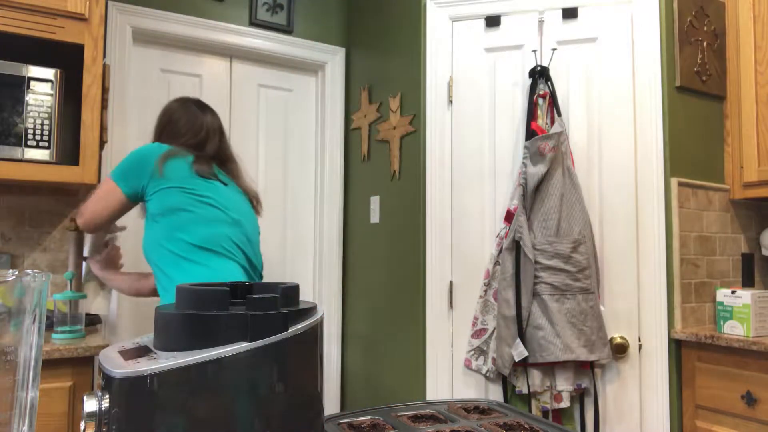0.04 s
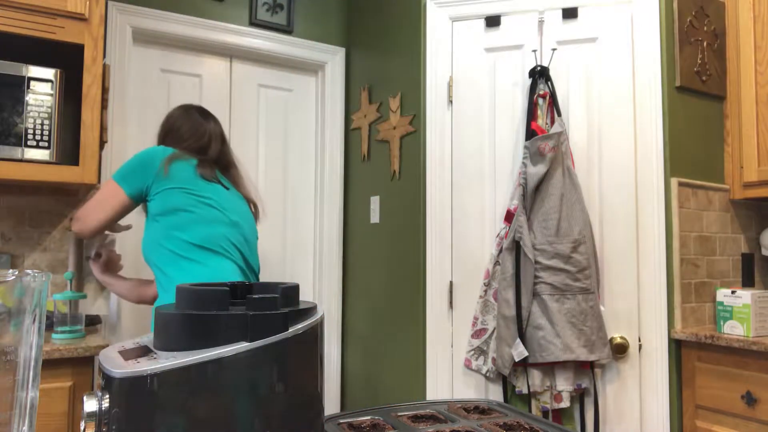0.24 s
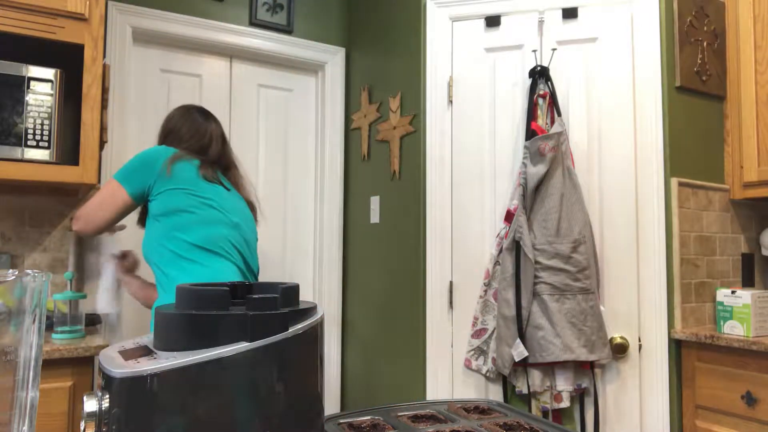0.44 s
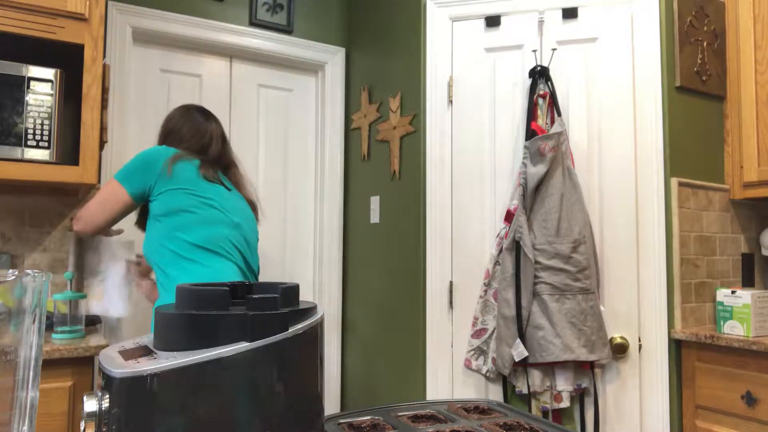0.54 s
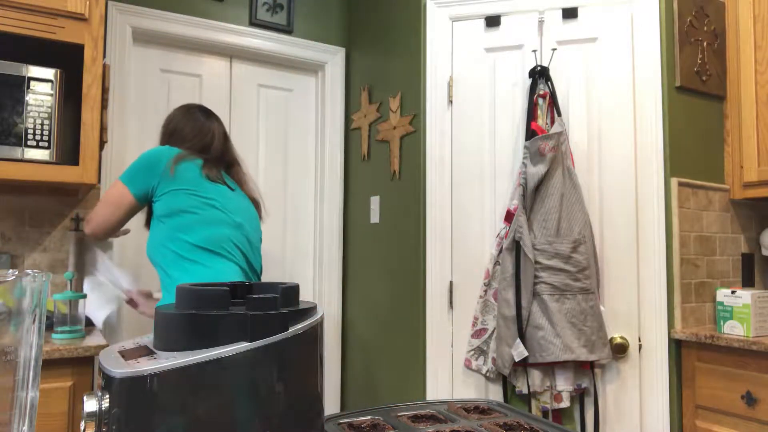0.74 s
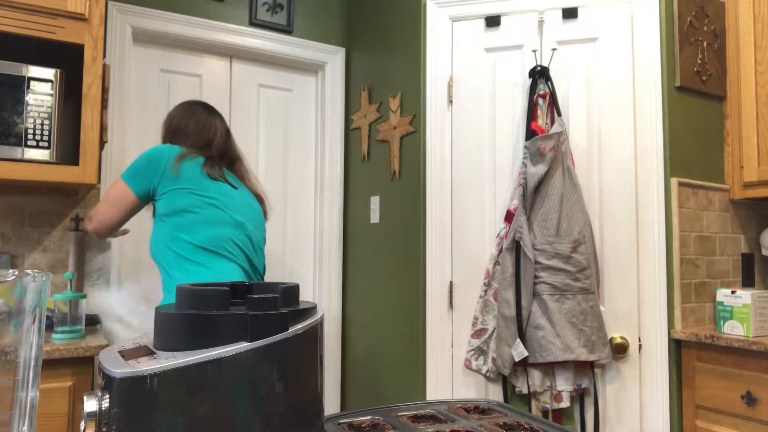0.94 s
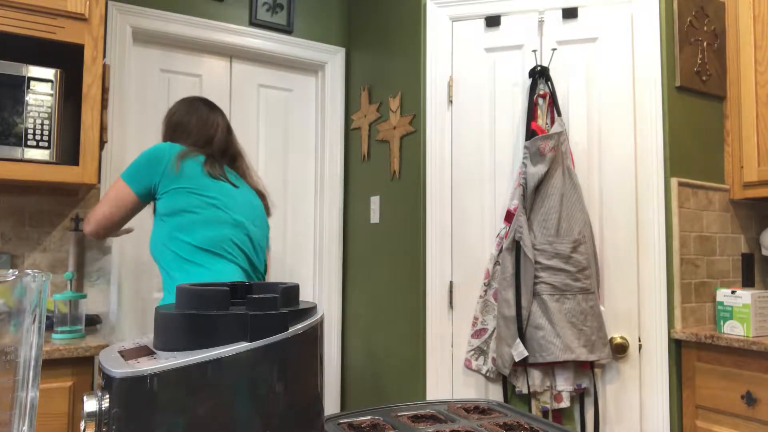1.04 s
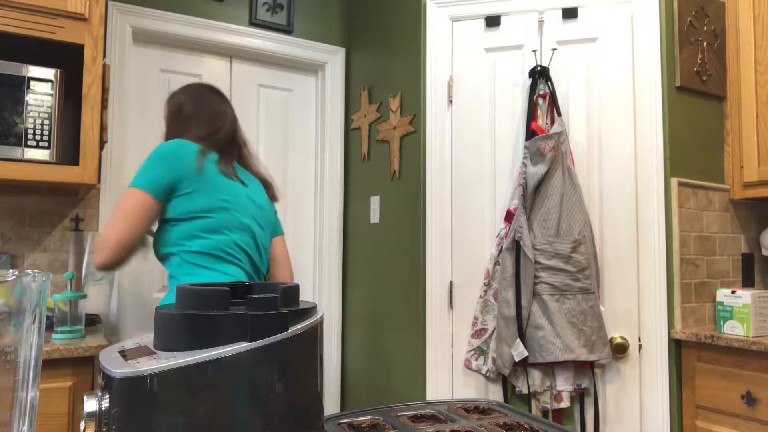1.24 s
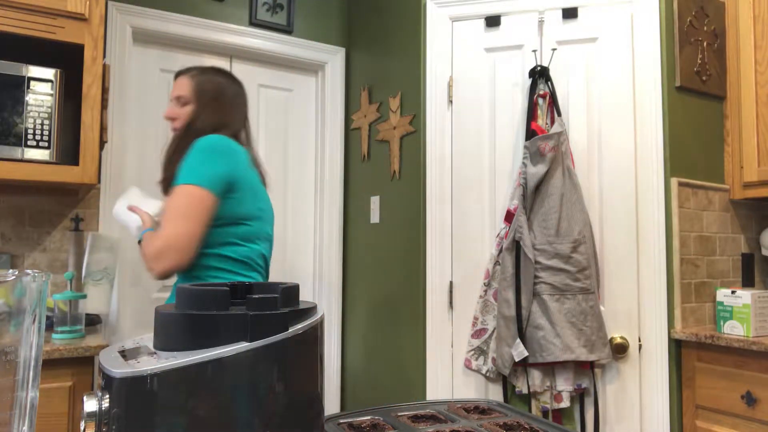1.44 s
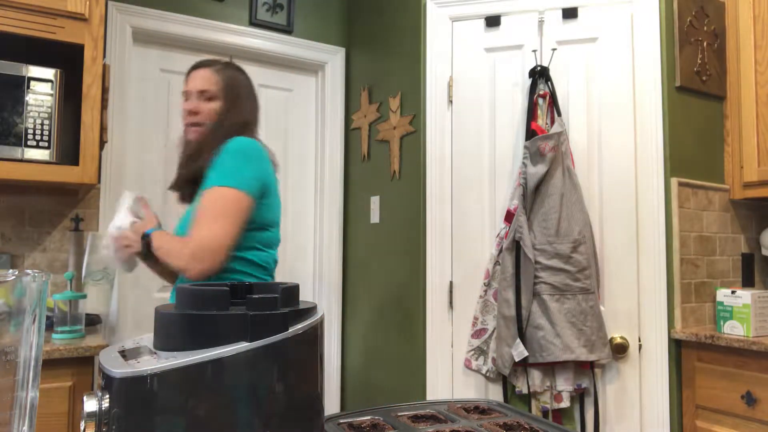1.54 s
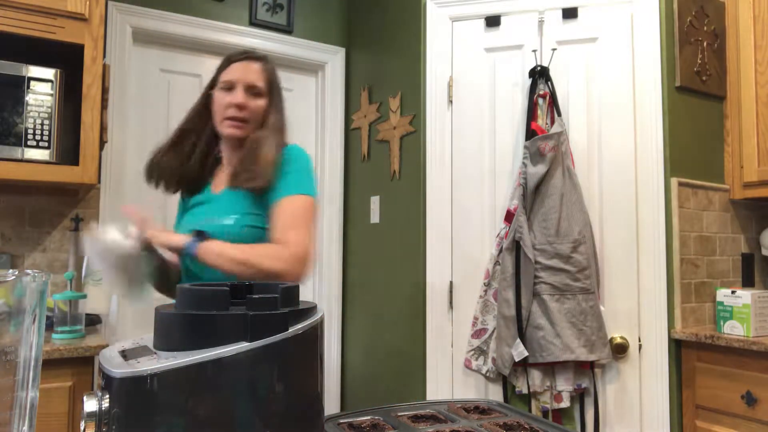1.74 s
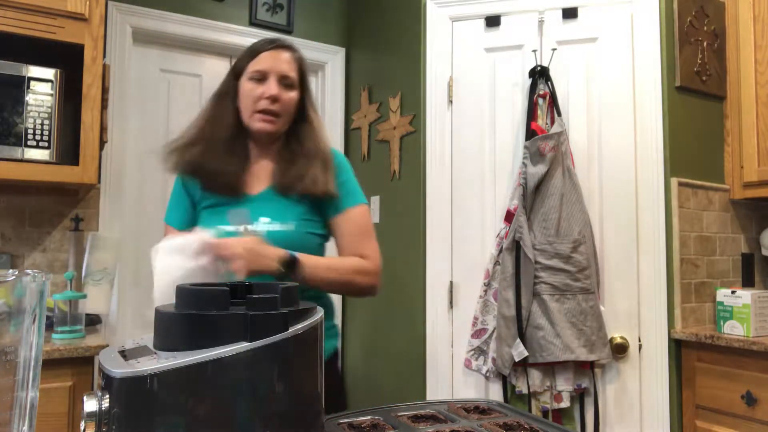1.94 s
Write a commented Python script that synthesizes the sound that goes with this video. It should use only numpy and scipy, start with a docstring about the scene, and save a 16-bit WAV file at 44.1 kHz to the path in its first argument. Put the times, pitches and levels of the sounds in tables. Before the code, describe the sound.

A paper towel is drawn off its roll with a soft rustle that builds over the first 0.7 seconds. From about 0.75 to 1 second it rips free in one short, crackling run of snaps, the loudest moment, while the roll gives a low, hollow shudder. Quieter folding and crumpling follow until 2 seconds, over the low, steady room tone of a small kitchen.

```python
"""A small kitchen: a paper towel is drawn off its roll, ripped away and gathered in the hands.
The perforation gives way in a quick run of snaps that ring the taut sheet, whose note sinks as it
comes loose. The roll squeaks faintly as it starts to turn and shudders under the rip.
Soft paper rustles before and after, over a low, steady room tone."""
import sys
import numpy as np
from scipy import signal
from scipy.io import wavfile

SR = 44100
rng = np.random.default_rng(int(sys.argv[2]) if len(sys.argv) > 2 else 0)


def store_wav(level_fs):
    """Save 16-bit WAV to argv[1]."""
    pcm = np.round(np.clip(np.atleast_2d(level_fs), -1, 1) * 32767)
    wavfile.write(sys.argv[1], SR, pcm.T.astype(np.int16))


N = 88200
T = np.arange(N) / SR

# the perforation's larger snaps: t/s, burst level/dB, burst decay/s, ring level/dB
SNAPS = [(0.762, -25.5, 0.0075, -22), (0.7652, -38, 0.0026, -23), (0.7932, -29.5, .006, -47),
         (.804, -41, 0.0055, -18.5), (0.825, -36, .003, -29), (0.84, -31.5, 0.0054, -22.5),
         (.845, -34.5, 0.009, -28), (.868, -35, 0.0038, -28), (.8885, -26.5, 0.0016, -23.5),
         (0.896, -34, 0.0052, -38), (0.915, -40, 0.0044, -19), (0.9334, -30, 0.0015, -30),
         (.941, -29.5, 0.00096, -37), (0.948, -36.5, 0.0048, -32)]


def tear():
    """Fibres part in a running crackle and in sharp bursts, coloured by the sheet's note."""
    # the rip running along the perforation: t/s, level/dB
    rip = [(.758, -88), (.764, -43), (.80, -37), (.85, -36.5), (.90, -37), (.95, -39.5), (.985, -52),
           (1.03, -50), (1.12, -78)]
    # spectrum of breaking fibres: f/Hz, level/dB
    fibre_colour = [(40, -27), (100, -10), (210, -4.5), (330, -4.5), (500, -9.5), (800, 2), (1200, 1),
                    (1700, 0), (2300, -4.5), (3800, -7), (6500, -16), (9000, -20.5), (15000, -23.5)]
    click_db, click_decay_s = 3.5, .00003  # the hard front edge of each burst
    fibres = level(rip) * crackle(per_s=3500, spread_db=3)
    grains = crackle(per_s=12000, spread_db=4)
    for start, db, decay_s, _ in SNAPS:
        age = T - T[round(start * SR)]
        burst = grains * np.exp(-abs(age) / decay_s)
        click = amp(click_db) * np.exp(-abs(age) / click_decay_s)
        fibres += amp(db) * (age >= 0) * (burst + click)
    crack = colour(fibres, fibre_colour)
    return amp(-2) * (crack + amp(-6) * resonate(crack, sheet_note(), width_hz=250))


def sheet_note():
    """The sheet's pitch in Hz sinks as it tears free and slackens."""
    taut_hz, slack_hz, sag_span_s = 965.3, 761, (.78, .96)
    return np.interp(T, sag_span_s, [taut_hz, slack_hz])


def sheet_ring():
    """Each snap rings the sheet for a few cycles."""
    rise_s, decay_s = .0029, .0044
    tone = np.sin(2 * np.pi * np.cumsum(sheet_note()) / SR)
    out = np.zeros(N)
    for start, _, _, db in SNAPS:
        age = np.maximum(T - start, 0)
        swell = (1 - np.exp(-age / rise_s)) * np.exp(-age / decay_s)
        out += amp(db) * swell * tone
    return out


def roll():
    """The roll squeaks faintly on its holder, then shudders with a hollow note under the rip."""
    # the shudder's swell: t/s, level/dB
    shudder = [(.76, -60), (.80, -43.5), (.84, -41.5), (.89, -43), (.94, -38.5), (.99, -60)]
    # its spectrum: f/Hz, level/dB
    shudder_colour = [(40, -15), (90, -4.5), (150, -0.5), (210, -2), (300, 2.5), (420, 0.5), (620, 3.5),
                      (1000, -7.5), (3000, -31), (15000, -50)]
    # squeaks of the turning roll: t/s, length/s, f/Hz, level/dB
    squeaks = [(.008, 0.058, 1333, -62), (0.1, 0.064, 1334, -65)]
    out = colour(level(shudder) * crackle(per_s=1500, spread_db=2), shudder_colour)
    out += amp(4.5) * resonate(out, hz=138.5, width_hz=28)  # the hollow note
    for start, length, hz, db in squeaks:
        progress = np.clip((T - start) / length, 0, 1)
        arch = np.sqrt(abs(np.sin(np.pi * progress)))
        band = resonate(rng.standard_normal(N), hz, width_hz=46)
        out += amp(db) * arch * unit(resonate(band, hz, width_hz=46))
    return out


def rustle():
    """Soft paper rubs and creases in dense, fine grains as it is handled."""
    # Each gesture has an envelope (t/s, level/dB) and a spectrum (f/Hz, level/dB).
    # the roll turning and the sheet drawn taut
    pull_level = [(0, -79), (.08, -65.5), (.12, -61.5), (.17, -64), (.225, -60.5), (.245, -51.5),
                  (.285, -56), (.34, -63), (.41, -50), (.48, -55.5), (.55, -58), (.60, -51.5), (.65, -51.5),
                  (.70, -50), (.76, -44.5), (.85, -52)]
    pull_colour = [(60, -12), (250, -6), (520, -5), (850, -0.5), (1200, -0.5), (1550, 0), (2200, -7.5),
                   (4000, -7), (7000, -12), (15000, -28.5)]
    # paper sliding over paper
    slide_level = [(0, -87), (.08, -74), (.12, -72), (.21, -70), (.28, -62), (.345, -71), (.405, -53),
                   (.44, -52.5), (.475, -45), (.51, -51), (.565, -47), (.62, -55.5), (.72, -52.5),
                   (.96, -47), (1.06, -68), (1.2, -78)]
    slide_colour = [(200, -4), (900, -12.5), (1800, 3), (3500, 1), (6500, -1), (9000, -2), (15000, -7)]
    # the loose sheet flapping and folding
    fold_level = [(.97, -53.5), (1.04, -57), (1.13, -53.5), (1.2, -62.5), (1.27, -56), (1.32, -63),
                  (1.372, -64.5), (1.39, -49.5), (1.42, -48.5), (1.445, -51.5), (1.49, -51), (1.55, -56),
                  (1.68, -59.5), (1.82, -69), (1.95, -60), (2, -53)]
    fold_colour = [(50, -11), (150, -0.5), (350, 0.5), (550, -1.5), (800, -4.5), (1300, 0), (2200, -6),
                   (4000, -10.5), (8000, -20), (15000, -27)]
    # the sheet crumpling in the hands
    crumple_level = [(1.05, -67), (1.19, -66), (1.25, -58.5), (1.32, -66), (1.37, -66), (1.392, -55),
                     (1.44, -61), (1.478, -51.5), (1.52, -57), (1.60, -55.5), (1.68, -57), (1.745, -53),
                     (1.77, -57), (1.79, -52), (1.82, -59.5), (1.89, -62), (1.95, -58), (1.99, -50)]
    crumple_colour = [(200, -9), (900, -17), (1600, -0.5), (3500, 1), (7000, -5), (9500, -9.5),
                      (15000, -14.5)]
    pull = colour(level(pull_level) * crackle(per_s=4400, spread_db=3), pull_colour)
    taut_note = resonate(pull, hz=965.3, width_hz=87)
    slide = colour(level(slide_level) * crackle(per_s=12000, spread_db=2), slide_colour)
    fold = colour(level(fold_level) * crackle(per_s=5000, spread_db=2), fold_colour)
    crumple = colour(level(crumple_level) * crackle(per_s=6600, spread_db=2.5), crumple_colour)
    return pull + taut_note + slide + fold + crumple


def echoes(size=32768, count=14):
    """One echo pattern: quick reflections off counter and cupboards, then a short tail."""
    # the room's reverb time: f/Hz, T60/s
    room_t60 = [(125, 0.41), (500, 0.63), (1500, 0.66), (4000, 0.62), (8000, 0.75), (15000, 0.25)]
    early_s = .018
    early = np.zeros(size)
    delays = rng.uniform(.001, early_s, count)
    early[(delays * SR).astype(int)] = rng.choice([-1., 1.], count) * np.exp(-delays / early_s)
    hz, t, bands = signal.stft(rng.standard_normal(size), SR, nperseg=256)
    decay = amp(-60 * t / read(room_t60, hz)[:, None])
    tail = signal.istft(bands * decay, SR)[1][:size]
    tail *= np.minimum(T[:size] / early_s, 1)
    return amp(-5) * early / np.linalg.norm(early) + amp(-6.5) * tail / np.linalg.norm(tail)


def kitchen(x, patterns=4):
    """Direct sound plus echo patterns that crossfade in turn as hands and sheet move."""
    crossfade_s = .045
    out = x.copy()
    for k in range(patterns):
        away = abs((T / crossfade_s - k) % patterns - patterns / 2)
        send = np.cos(np.pi / 2 * np.minimum(away, 1))
        out += signal.fftconvolve(x * send, echoes())[:N]
    return amp(-2.5) * out


def room_tone():
    """A bed of low room noise with a faint mains hum."""
    # spectrum of the room noise: f/Hz, level/dB
    air_colour = [(20, -28), (40, -15.5), (62, 2.5), (95, 0), (140, 1), (200, -3), (280, -1.5),
                  (420, -13.5), (560, -9.5), (900, -16), (2000, -23), (5000, -27), (15000, -35.5)]
    hum_hz = 59.9
    air = colour(rng.standard_normal(N), air_colour)
    hum = unit(np.sin(2 * np.pi * hum_hz * T))
    return amp(-59) * air + amp(-69.5) * hum


def amp(db):
    """Decibels to gain."""
    return 10 ** (np.asarray(db) / 20)


def unit(x):
    """Scales to rms 1."""
    return x / np.sqrt(np.mean(x ** 2) + 1e-20)


def read(points, hz):
    """Reads a table along a log-frequency axis."""
    f, value = np.transpose(points)
    return np.interp(np.log(hz + 1), np.log(f + 1), value)


def level(points):
    """Gain envelope from rows of t/s, level/dB, fading to silence beyond its ends."""
    s, db = np.transpose(points)
    outside = np.maximum(s[0] - T, 0) + np.maximum(T - s[-1], 0)
    return amp(np.interp(T, s, db)) * np.exp(-outside / .02)


def response(points, size=4096):
    """Minimum-phase impulse response with the given spectrum."""
    hz = abs(np.fft.fftfreq(size, 1 / SR))
    log_gain = np.log(amp(read(points, hz)))
    spectrum = np.exp(np.conj(signal.hilbert(log_gain)))
    return np.fft.ifft(spectrum).real[:size // 2]


def colour(x, points):
    """Filters by a spectrum, keeping the power of white noise."""
    taps = response(points)
    return signal.fftconvolve(x, taps / np.linalg.norm(taps))[:N]


def resonate(x, hz, width_hz):
    """A resonance of gain 1 that can follow a moving pitch."""
    carrier = np.exp(2j * np.pi * np.cumsum(hz * np.ones(N)) / SR)
    pole = np.exp(-np.pi * width_hz / SR)
    return 2 * (carrier * signal.lfilter([1 - pole], [1, -pole], x / carrier + 1e-18)).real


def crackle(per_s, spread_db):
    """Random tiny clicks, most weak and a few strong."""
    strength = amp(spread_db * np.minimum(rng.exponential(1, N), 4))
    polarity = rng.choice([-1., 1.], N)
    hits = rng.random(N) < per_s / SR
    return unit(strength * polarity * hits)


def scene():
    """Paper and roll in the kitchen over room tone; the sheet's ring sits drier than the rest."""
    ring = sheet_ring()
    in_room = kitchen(tear() + roll() + rustle() + amp(-6.5) * ring)
    return (in_room + amp(-4.5) * ring + room_tone())[None]


def record(dry):
    """The microphone colours the treble, and a steep low-pass trims the very top."""
    # microphone response: f/Hz, level/dB
    mic = [(20, 1.5), (4200, 0.5), (4900, -3.5), (5700, 0.5), (7000, -0.5), (8300, -4), (9500, -3.5),
           (10400, -7.5), (11300, -2), (15500, -1.5)]
    cutoff_hz = 15800
    heard = signal.fftconvolve(dry, response(mic)[None], axes=1)[:, :N]
    low_pass = signal.firwin(511, cutoff_hz, window=("kaiser", 9), fs=SR)
    return signal.oaconvolve(heard, low_pass[None], "same")


dry = scene()
out = record(dry)
store_wav(out)
```